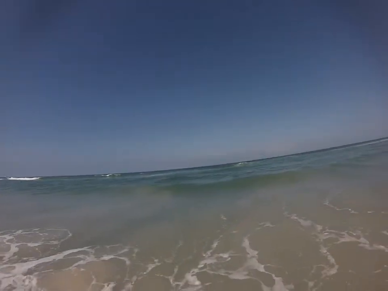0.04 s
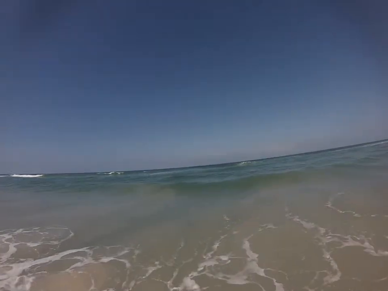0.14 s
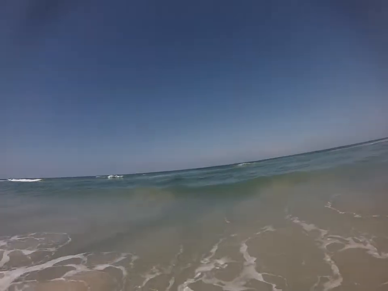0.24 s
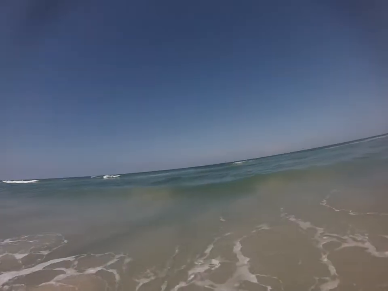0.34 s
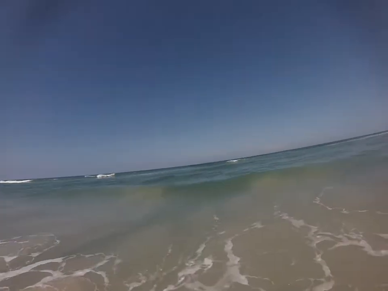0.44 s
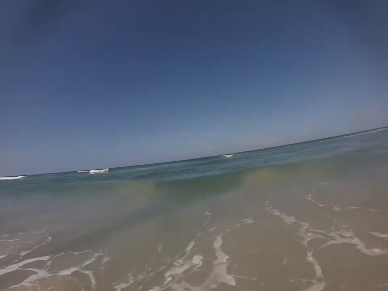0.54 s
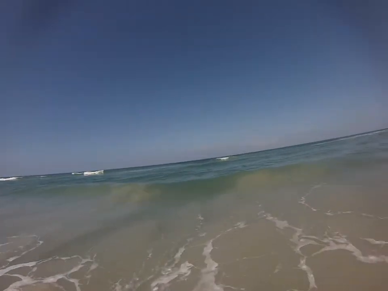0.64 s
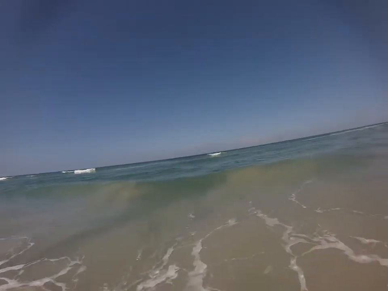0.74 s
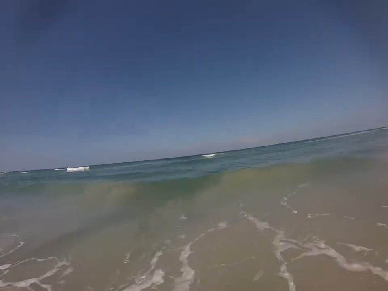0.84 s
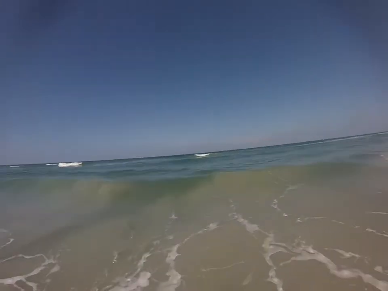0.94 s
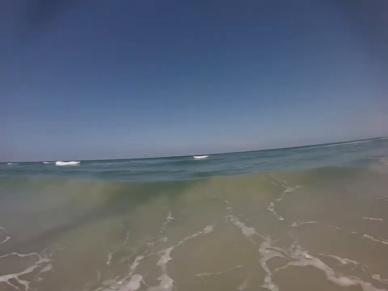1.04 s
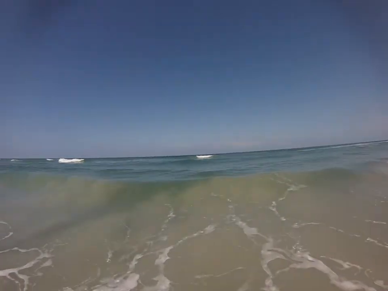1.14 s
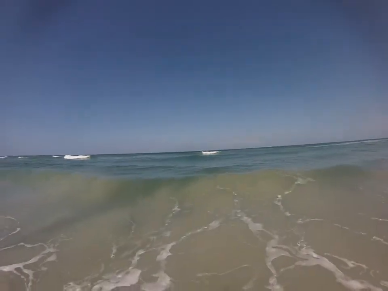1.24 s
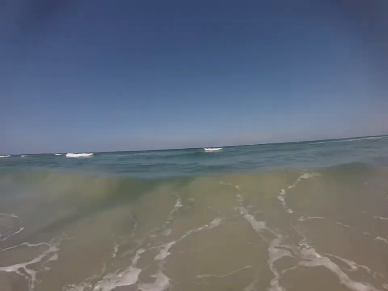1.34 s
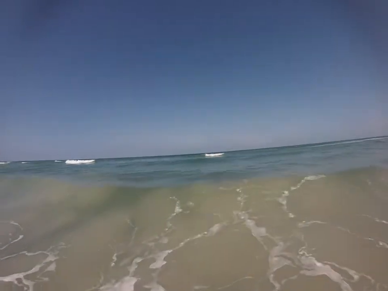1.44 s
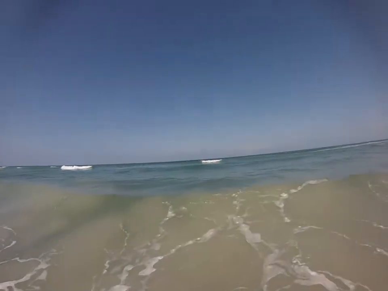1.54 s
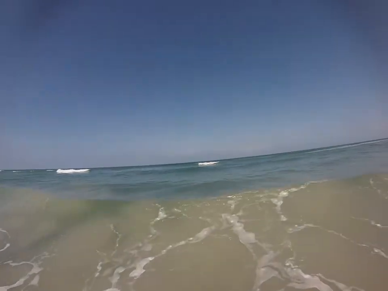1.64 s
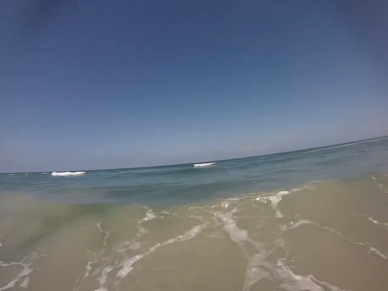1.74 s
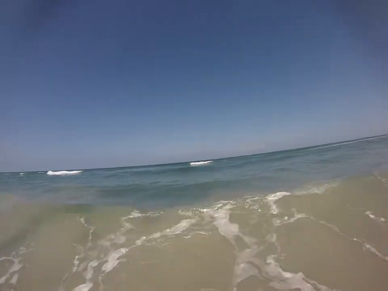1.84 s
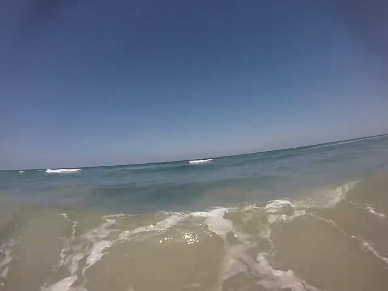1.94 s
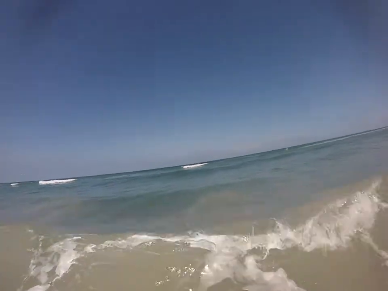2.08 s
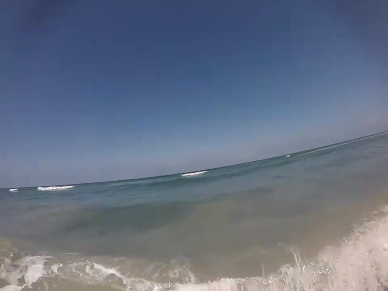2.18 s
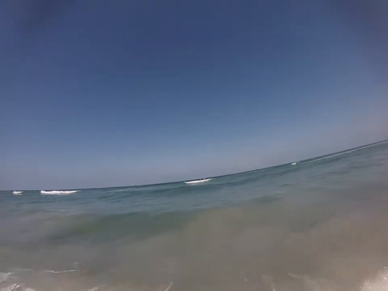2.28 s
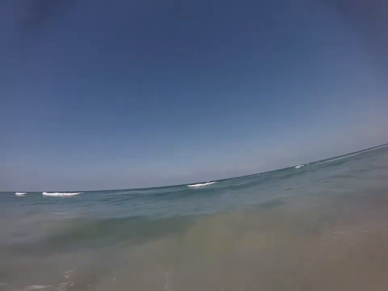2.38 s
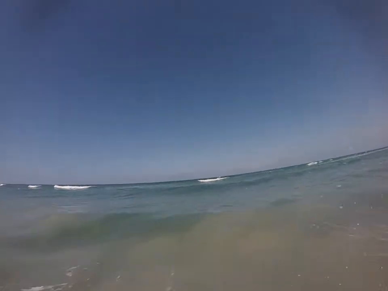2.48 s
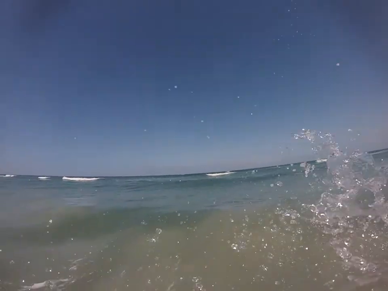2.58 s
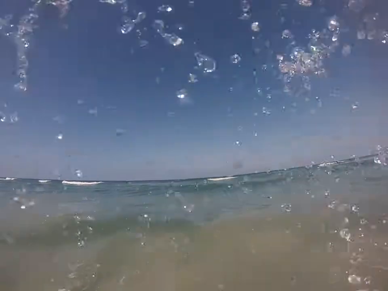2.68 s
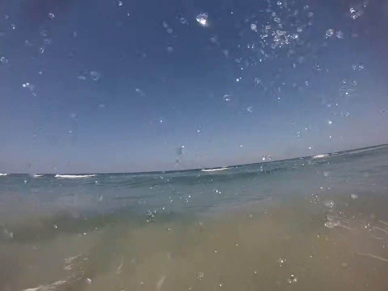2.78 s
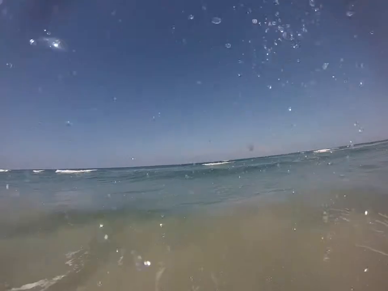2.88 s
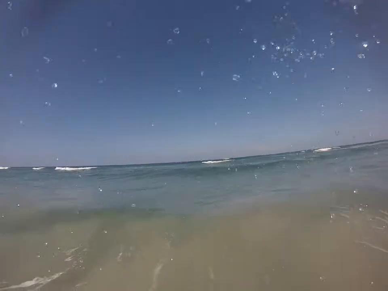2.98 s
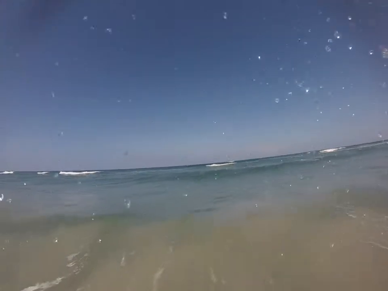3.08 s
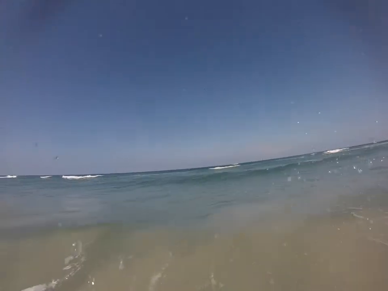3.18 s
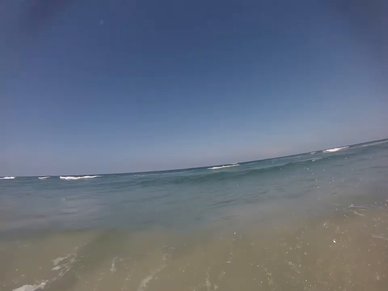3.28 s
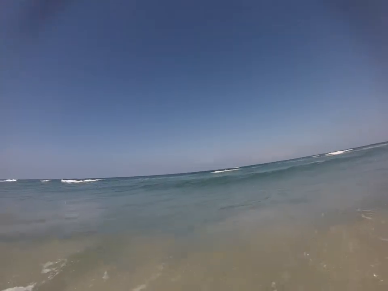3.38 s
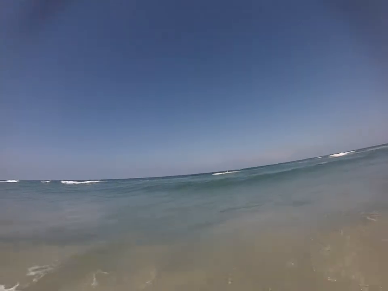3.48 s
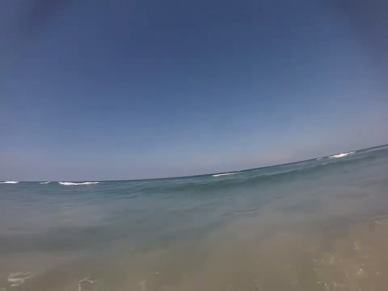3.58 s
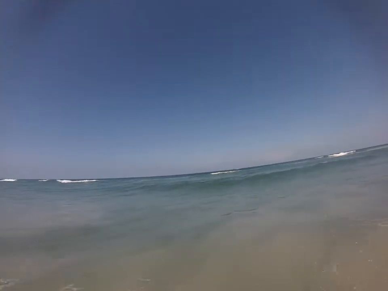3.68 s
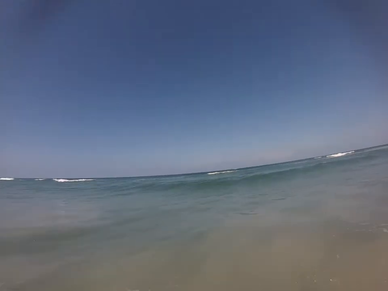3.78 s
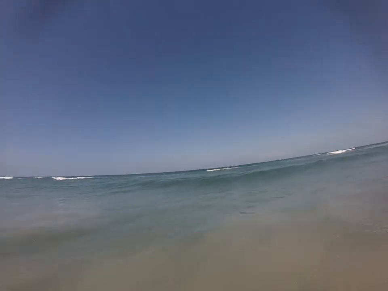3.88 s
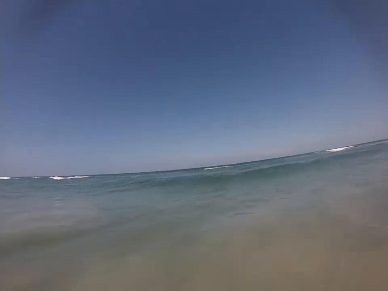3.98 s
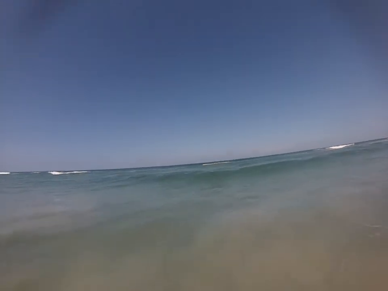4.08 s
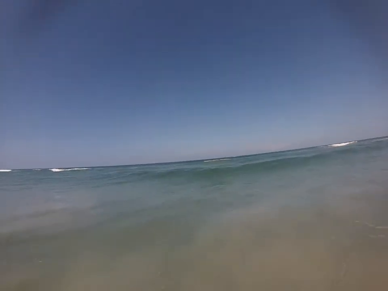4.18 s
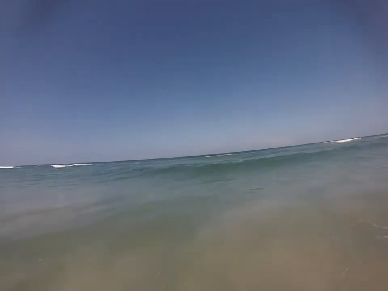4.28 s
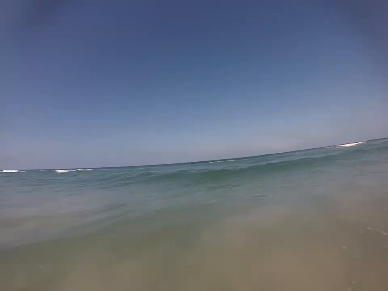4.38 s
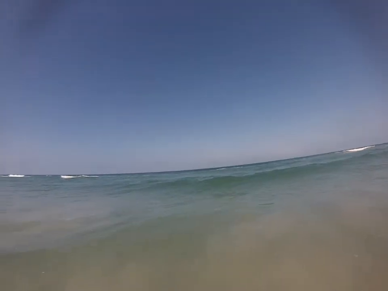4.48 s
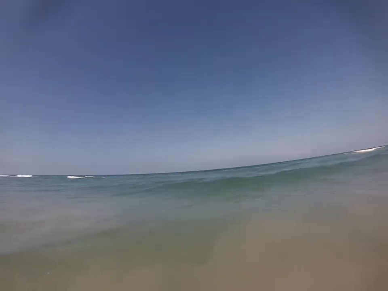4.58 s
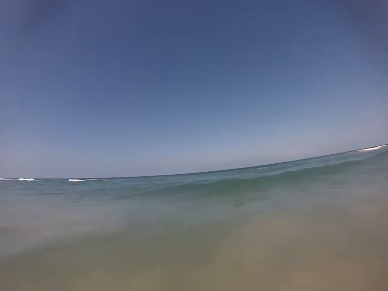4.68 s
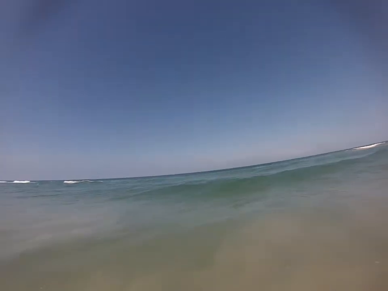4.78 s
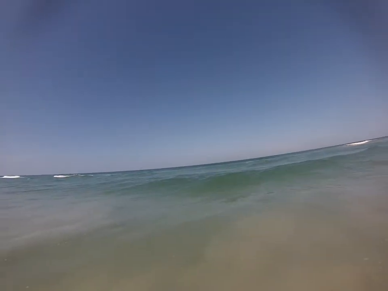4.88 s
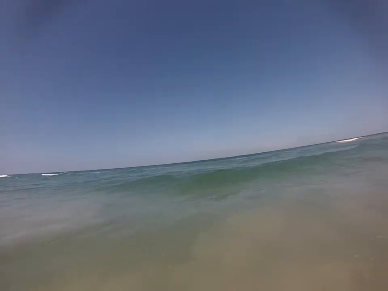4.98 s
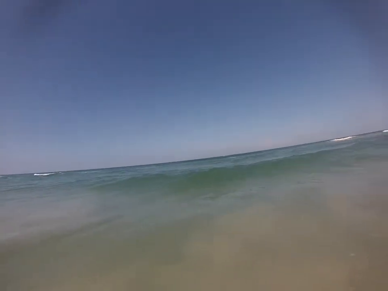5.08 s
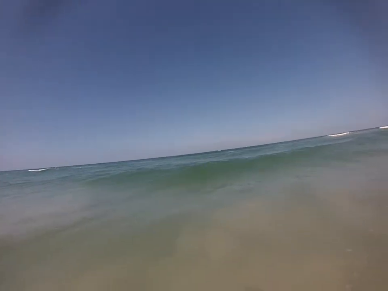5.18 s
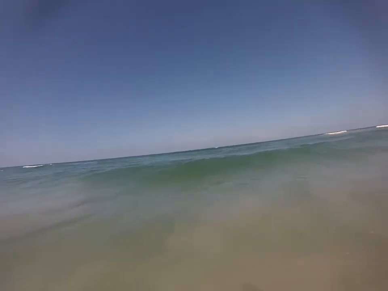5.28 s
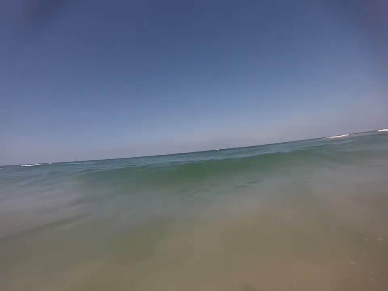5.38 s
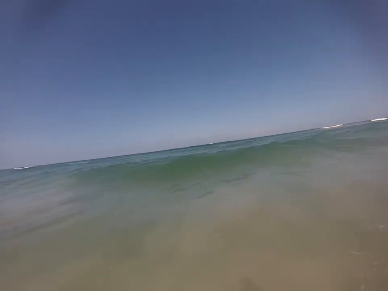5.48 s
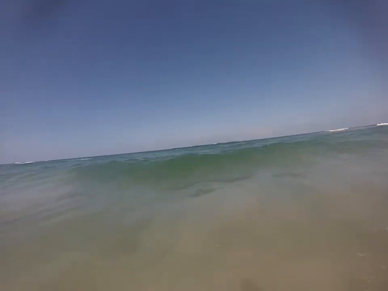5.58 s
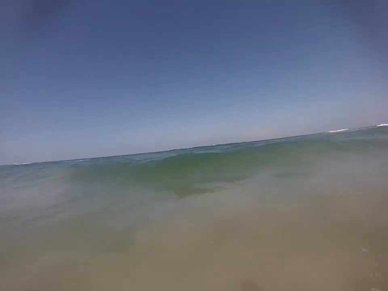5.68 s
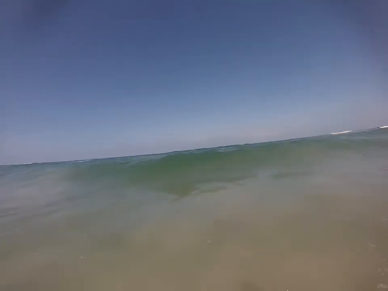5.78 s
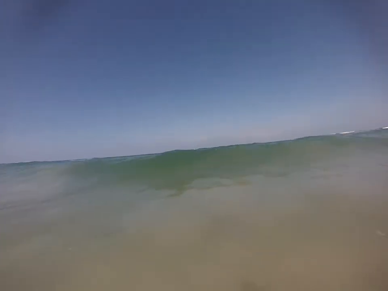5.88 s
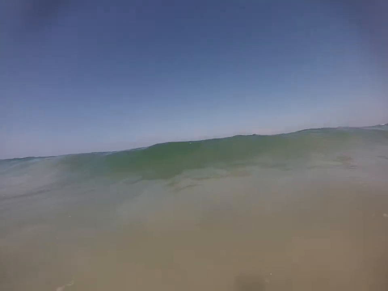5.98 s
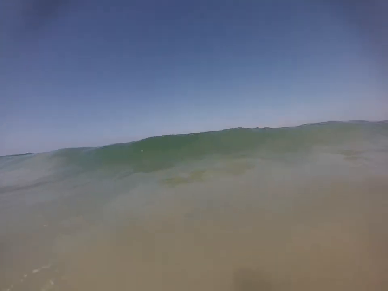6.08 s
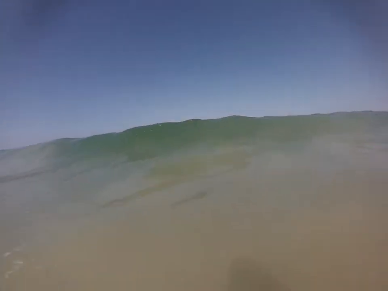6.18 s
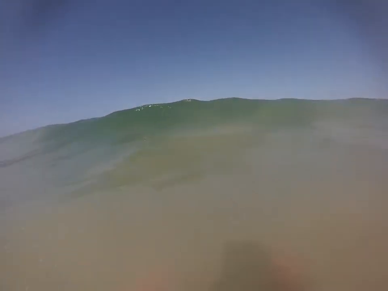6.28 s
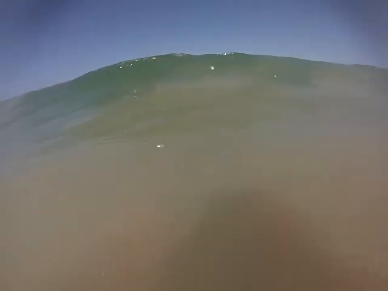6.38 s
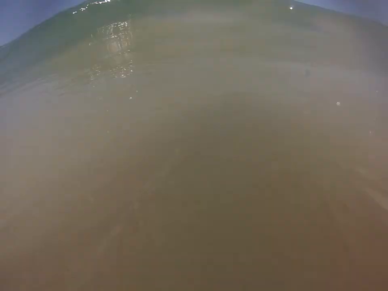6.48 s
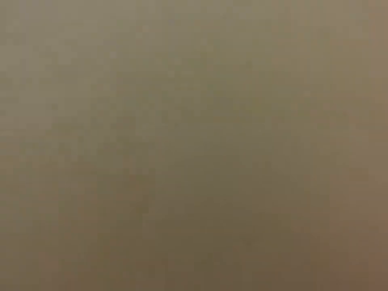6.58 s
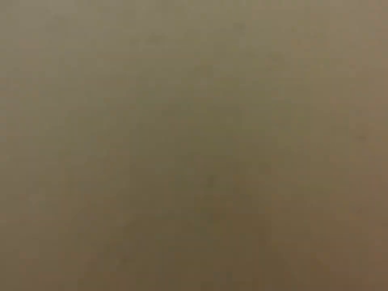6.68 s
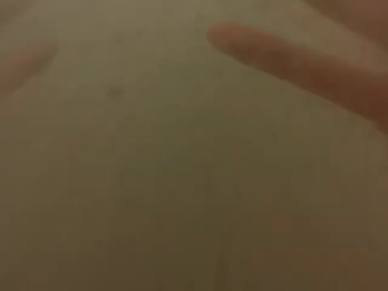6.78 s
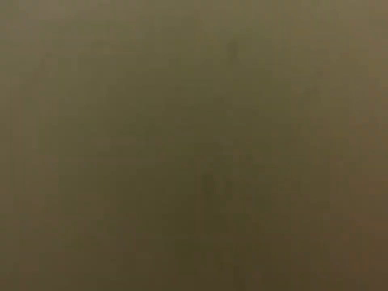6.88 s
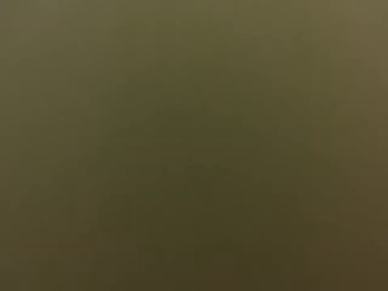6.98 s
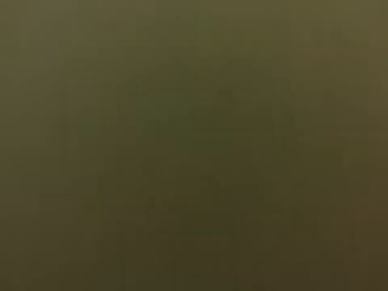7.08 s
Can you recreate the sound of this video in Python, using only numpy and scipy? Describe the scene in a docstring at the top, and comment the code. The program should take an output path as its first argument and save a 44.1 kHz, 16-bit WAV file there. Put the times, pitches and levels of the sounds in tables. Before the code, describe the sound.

Close, muffled sound from inside a sealed plastic case at the surface of shallow sea. Faint steady hiss and soft, boxy foam wash lie under very deep wading thumps at about 0, 0.7, 1.3 and 2 s, each a short sagging throb with a dull knock. Tiny drips sound near 1.1 s. From 2.2 s foam swells, peaking near 2.5 s with spatters; at 2.7 s a drop cracks sharply on the case, ringing thinly amid quick rising plips. Wash stays fuller until about 3.9 s, then thins, with sparse ticks, low rumble and thumps near 3, 4.6 and 5.4 s. Spatters gather around 5.5-6.5 s. At 6.58 s a wave slaps violently, distorting with a hollow honk; another heavy shove hits at 6.7 s. Until the end just after 7 s, dense wet crackle, short knocking slaps, slosh and low gurgles engulf everything, surf hiss vanishing.

```python
"""Surf hisses and rumbles through a sealed plastic camera housing carried by a wader in shallow water.
Foam is random clicks through the shell's resonances; each step swings the air sealed in the case.
Spray is short noise bursts, drips are gliding bubble tones, and a big drop rings the lens cover's modes.
At the end a wave slaps the housing, overloads the microphone and closes over the case: slaps are short
cavity tones, shoves smooth pressure pulses, and the water crackling and gurgling bubbles."""
import sys
import numpy as np
from scipy import signal
from scipy.fft import rfft, irfft, next_fast_len
from scipy.io import wavfile

SR = 44100
rng = np.random.default_rng(int(sys.argv[2]) if len(sys.argv) > 2 else 0)


def wrap_up_sound(samples):
    """Save the sound to the file named by the first command line argument, as 16-bit audio."""
    columns = np.atleast_2d(samples).T
    # keep every value between -1 and 1, then stretch to whole-number steps
    tamed = np.clip(columns, -1, 1)
    steps = np.round(tamed * 32767).astype(np.int16)
    wavfile.write(sys.argv[1], SR, steps)


N = 314874

# Foam round the case, before patter: time_s, wash_level_db, fizz_level_db
FOAM_LEVELS = [(0.0, -76, -81.5), (0.7, -74.5, -83.5), (1.05, -69.5, -81.5), (1.4, -75, -84.5),
               (2.07, -74.5, -86), (2.2, -68, -76), (2.32, -62, -70), (2.47, -54.5, -60.5),
               (2.6, -58.5, -73), (2.8, -61.5, -65), (2.92, -63, -87), (3.07, -59, -71.5),
               (3.27, -62, -68.5), (3.85, -65, -77.5), (4.03, -71, -89), (4.16, -65.5, -72),
               (4.43, -65, -79), (4.75, -70, -85), (5.17, -70.5, -80.5), (5.5, -71, -86), (5.9, -68, -83),
               (6.36, -69, -87), (6.47, -66, -68), (6.53, -53, -55)]
# Shell resonances fed by wash: pitch_hz, width_hz (of one pass), relative_level_db
WASH_MODES = [(1509, 373, 1), (2140, 330, -1.5), (2746, 250, -5), (3120, 230, -9.5)]
# Shell resonances fed by fizz: pitch_hz, width_hz (of one pass), relative_level_db
FIZZ_MODES = [(4750, 1300, 0), (5600, 900, -5), (6950, 1000, 0), (7730, 500, -3), (10800, 2400, -11)]
# Broad part of the wash through the shell: frequency_hz, gain_db
SHELL_LEAK = [(300, -7), (700, -8.5), (1200, -11), (3000, -15), (6000, -21.5), (9000, -28), (13000, -34),
              (15500, -60.5)]
# Spectrum shape of the microphone's own noise: frequency_hz, relative_density_db (per Hz)
MIC_NOISE = [(53, -34.5), (90, 0.5), (625, -11.5), (1480, -12.5), (1880, -19.5), (2090, -13.5), (2480, -17),
             (2760, -22.5), (11700, -30), (15500, -53.5)]
# Spectrum shape of rumble and slosh: frequency_hz, relative_density_db (per Hz)
RUMBLE = [(10, 2), (22, 8.5), (45, 3), (70, -3.5), (100, -33), (200, -45.5), (400, -61.5)]
# Wading steps and bumps of water: start_s, swell_peak_db, final_pitch_hz
STEPS = [(-.022, -18.5, 34.15), (0.655, -16.5, 33), (1.306, -27, 31.7), (1.983, -16.5, 33),
         (2.4325, -32.5, 46), (2.766, -40, 43.9), (2.991, -23, 38.2), (3.954, -39, 35.23),
         (4.612, -24, 36.4), (5.399, -20, 34.4), (5.444, -36.5, 41.7), (5.983, -36, 38.5),
         (6.422, -33.5, 35.94), (6.583, -26.5, 44.8)]
# Water pushing the wading body about: time_s, rumble_level_db (before shakes and drift)
SWAY = [(0.0, -59), (0.31, -59.5), (0.6, -62), (1.7, -66), (1.96, -58.5), (2.95, -51.5), (3.33, -65),
        (4.54, -55), (5.07, -61), (5.49, -50), (5.76, -59.5), (6.5, -50)]
# Spray on the case, before the shell: start_s, strike_level_db, brightness_db
SPRAY = [(1.1844, -50, -4), (1.9952, -49.5, 14), (2.3894, -41.5, 4), (2.476, -36, 3.5), (2.5635, -43, -16),
         (2.5938, -42.5, 8), (2.6399, -43, 6), (3.2345, -44, -1), (3.254, -43.5, -0.5), (3.4945, -44, -4),
         (3.5349, -54, -3.5), (3.7658, -43, 7), (3.7797, -45, 1), (4.2281, -46, 6), (5.5254, -47, 0.5),
         (5.6141, -46.5, 9.5), (5.8087, -47, 6), (5.8397, -47.5, 5.5), (6.009, -49, 6), (6.0743, -48, 5.5),
         (6.1855, -49.5, 10.5), (6.2444, -46.5, 5), (6.4425, -42.5, -7.5), (6.4602, -41, 10)]
# Drips plopping nearby: start_s, peak_db, first_pitch_hz, last_pitch_hz, length_ms
DRIPS = [(1.115, -62.5, 630, 726, 21.4), (1.18, -62, 4600, 4880, 12), (2.142, -51, 2370, 2954, 8.4),
         (2.646, -52, 890, 1308, 11.8), (2.656, -43, 1470, 2590, 14), (3.534, -41.5, 1970, 2650, 6.16)]
# Shoves of water against the case, before the vent: centre_s, peak_db, width_ms (standard deviation)
SHOVES = [(2.4383, -39, 0.88), (6.431, -39, 0.85), (6.586, -9, 3), (6.7067, 6, 0.81)]
# Lens cover modes, broad ones for the crack and thin ones ringing on: pitch_hz, level_db, t60_s
COVER_MODES = [(170, -38, .03), (330, -33, .015), (600, -26, .012), (1250, -26, .012), (1700, -26, .012),
               (2260, -24, .015), (3216, -17, .012), (4400, -11, .011), (5620, -16, .012), (6250, -19, .01),
               (7750, -11, .01), (9110, -8, .008), (11100, -10, .005), (13000, -22, .005), (3079, -52, .3),
               (4054, -56, .17), (4554, -44, .22), (4931, -42, .07), (5491, -59, .22), (5809, -58, .16),
               (6481, -50, .11), (7730, -52, .13)]
# Water tumbling over the case, before clumping: time_s, crackle_db, bright_crackle_db, slosh_db
UNDER_LEVELS = [(6.45, -70, -71.5, -45), (6.53, -53.5, -58.5, -41), (6.57, -40, -56, -47),
                (6.59, -28.5, -45.5, -43), (6.65, -40, -50.5, -35), (6.69, -29, -28.5, -43),
                (6.73, -42.5, -53.5, -44), (6.77, -35, -57, -28), (6.83, -34.5, -48, -45),
                (6.89, -35.5, -46, -34), (6.95, -30.5, -37.5, -23.5), (7.03, -38.5, -45.5, -43),
                (7.06, -36, -42, -36), (7.14, -43.5, -62, -48)]
# Spectrum shape given to the crackle: frequency_hz, relative_gain_db
CRACKLE = [(290, -39), (500, -9.5), (620, -14.5), (954, -13.5), (1990, -3), (2290, -0.5), (3010, -12),
           (3630, -12), (4980, -18.5), (7230, -13.5), (10200, -24), (11400, -20), (15500, -29)]
# Water slapping the microphone cavity: start_s, tone_level_db, pitch_hz, hold_ms (before decay)
SLAPS = [(6.5748, -14.5, 2150, 3.7), (6.581, 7.5, 2075, 2.08), (6.581, -6.5, 933, 1.7),
         (6.5868, -14, 1454, 1.9), (6.634, -24.5, 2196, 2.6), (6.657, -25, 2090, 1.1),
         (6.668, -16, 2230, 1.3), (6.6722, -17, 2230, 0.9), (6.674, -15, 1130, 0.6),
         (6.684, -24.5, 2500, 1.3), (6.696, -19, 2280, 2.1), (6.785, -20, 1830, 2.1),
         (6.84, -20.5, 2226, 5.1), (6.899, -14.5, 2102, 1.5), (6.908, -19, 1590, 1.4),
         (6.932, -24, 2220, 3.5), (7.004, -21, 2270, 2.2), (7.01, -21, 2425, 1.3), (7.039, -19, 804, 1)]
# Big air pockets gurgling: start_s, length_s, first_pitch_hz, last_pitch_hz, peak_db
GURGLES = [(6.71, 0.0433, 197, 186.4, -33), (6.789, 0.0553, 290, 235, -16), (6.857, 0.018, 224.5, 141, -14),
           (6.903, 0.026, 225, 322, -19), (6.945, 0.0194, 259, 293, -18), (7.033, 0.0214, 136, 129, -44),
           (7.07, 0.044, 285, 259, -29)]

MIC_NOISE_DB = -73.5
COVERED_S, DROP_S = 7.1, 2.6848   # the wave has closed over the case; the big drop lands
STEP_MS, STEP_TAIL_DB, STEP_TAIL_S = 10.1, -14, .05   # swell time constant; a weaker swing lingers
KNOCK_DB, KNOCK_FOLLOWS = -54, 0.46   # level for a 0 dB step; knock dB per step dB
# The body shakes around each step: level relative to the step, decay after it, growth before it
AFTERSHAKE_DB, AFTERSHAKE_S, LEG_SWING_S = -27, 0.044, 0.041
SPATTER_MS, SPATTER_GROWS = 3.3, 0.83   # decay time at -50 dB; dB of decay time per dB of level
STRAY_PER_S, STRAY_DB = 3.3, -54   # faint stray drops; lowest strike level
# Large bubbles begin once the case is under
CHURN_S, CHURN_RISE_S, CHURN_DB, CHURN_FADE_DB_PER_S = 6.67, 0.057, -28, 14.5
SLAP_DIES_MS = 1.13
CUTOFF_HZ = 15600


def from_db(db):
    """Level law: twenty decibels are a factor of ten in amplitude."""
    return 10 ** (np.asarray(db) / 20)


def rms_one(x):
    """Normalisation: dividing by the root mean square gives unit level."""
    return x / np.sqrt(np.mean(x ** 2) + 1e-20)


def in_time(rows):
    """Linear interpolation: each column of a time table is evaluated at every sample."""
    s, *columns = np.transpose(rows)
    return [np.interp(np.arange(N) / SR, s, column) for column in columns]


def filtered(x, order, edge_hz, kind):
    """Butterworth filtering: the pass band is maximally flat."""
    return signal.sosfilt(signal.butter(order, edge_hz, kind, fs=SR, output="sos"), x)


def colour(x, spectrum):
    """Spectral shaping: each Fourier component is scaled by a gain read on a log-frequency axis."""
    size = next_fast_len(len(x))
    hz, db = np.transpose(spectrum)
    log_bins = np.log(np.arange(size // 2 + 1) * SR / size + 1)
    gain = from_db(np.interp(log_bins, np.log(hz), db))
    return irfft(rfft(x, size) * gain, size)[:len(x)]


def drift(rate_hz):
    """Slow random fluctuation: a double pole smooths white noise, scaled to unit spread."""
    hold = 40   # samples between the slow values
    r = np.exp(-2 * np.pi * rate_hz * hold / SR)
    noise = rng.standard_normal(N // hold + 2002)
    slow = signal.lfilter([1], [1, -2 * r, r * r], noise)[2000:]   # settled part
    return np.interp(np.arange(N) / hold, np.arange(len(slow)), rms_one(slow))


def resonate(x, hz, width_hz):
    """Damped resonance: a pole pair whose radius sets the width, with about unit gain at its peak."""
    r = np.exp(-np.pi * width_hz / SR)
    zeros = np.array([1, 0, -1]) * (1 - r * r) / 2
    return signal.lfilter(zeros, [1, -2 * r * np.cos(2 * np.pi * hz / SR), r * r], x)


def resonances(x, modes):
    """Modal superposition: parallel resonances add, each applied twice for dark valleys between."""
    return sum(from_db(db) * resonate(resonate(x, hz, width_hz), hz, width_hz)
               for hz, width_hz, db in modes)


def patchy_shell(x, modes, patchy_db):
    """Incoherent excitation: each resonance takes another stretch of foam and flickers on its own."""
    return sum(resonances(np.roll(x, 1009 * k), [mode]) * from_db(patchy_db * drift(10))
               for k, mode in enumerate(modes))


def grains(per_s, spread_db):
    """Random arrivals: independent clicks of uneven size and either sign."""
    sizes = from_db(spread_db * np.minimum(rng.exponential(1, N), 4)) * rng.choice([-1, 1], N)
    return sizes * (rng.random(N) < per_s / SR) + 1e-18


def bubbles(per_s, low_hz, high_hz, cycles, spread_db):
    """Bubble resonance: each swells and dies in a few cycles at one of 18 pitches; the sum has rms 1."""
    born = grains(per_s, spread_db)
    dealt = rng.integers(0, 18, N)   # which pitch a bubble gets
    total = np.zeros(N)
    for k, hz in enumerate(np.geomspace(low_hz, high_hz, 18)):
        own = born * (dealt == k) + 1e-18
        total += resonances(own, [(hz, 3.3 * hz / cycles, 0)]) / np.sqrt(hz)
    return rms_one(total)


def add(out, s, x):
    """Superposition: x is summed into out from time s, cut to what fits."""
    at = round(s * SR)
    x = x[max(-at, 0):N - at]
    out[max(at, 0):max(at, 0) + len(x)] += x


def microphone_hiss():
    """Self-noise: steady random noise has the microphone's own spectrum."""
    return from_db(MIC_NOISE_DB) * rms_one(colour(rng.standard_normal(N), MIC_NOISE))


def shaking():
    """Addition of powers: the push of the water and a shake around each step set the rumble gain."""
    power, t = from_db(2 * in_time(SWAY)[0]), np.arange(N) / SR
    for s, db, hz in STEPS:
        since = t - s - 2 / hz   # the shake peaks two periods into the step
        fall_s = np.where(since > 0, AFTERSHAKE_S, LEG_SWING_S)
        power = power + from_db(2 * (db + AFTERSHAKE_DB)) * np.exp(-np.abs(since) / fall_s)
    return np.sqrt(power)


def body_rumble():
    """Structure-borne sound: low noise follows the shaking of the wading body."""
    noise = rms_one(colour(rng.standard_normal(N), RUMBLE))
    return noise * shaking() * from_db(3.15 * drift(10))


def surf():
    """Resonant transmission: bursting foam excites the shell; it and the rumble stop once covered."""
    wash_db, fizz_db = in_time(FOAM_LEVELS)
    above = np.clip((COVERED_S - np.arange(N) / SR) / 0.015, 0, 1)
    patter_db = 1.3 * drift(25)

    foam = grains(9000, spread_db=4.5)
    wash = rms_one(patchy_shell(foam, WASH_MODES, patchy_db=0.5) + colour(foam, SHELL_LEAK))
    trickles = bubbles(500, 900, 3300, cycles=14.0, spread_db=2.5)   # near the case
    wash = wash + from_db(-8) * trickles

    spume = grains(9000, spread_db=4.5)
    broad_fizz = resonances(spume, [(5039, 4500, 0.0001)])
    fizz = rms_one(patchy_shell(spume, FIZZ_MODES, patchy_db=1.0) + from_db(-10.5) * broad_fizz)

    hiss = wash * from_db(wash_db + patter_db) + fizz * from_db(fizz_db + 1.4 * patter_db)
    return above * (hiss + body_rumble())


def steps():
    """Enclosed-air oscillation: a step starts a dip and dying swings of sagging pitch, with a dull knock."""
    out, t = np.zeros(N), np.arange(SR // 4) / SR
    rise = t * 500 / STEP_MS   # 1 at the swell's peak, two time constants in
    swell = rise ** 2 * np.exp(2 - 2 * rise)
    end_fade = np.hanning(2 * len(t))[len(t):]
    tail = np.minimum(rise, 1) ** 2 * np.exp(-t / STEP_TAIL_S) * end_fade
    swell = swell + from_db(STEP_TAIL_DB) * tail
    for s, db, hz in STEPS:
        turns = hz * (t + 0.0081 * (1 - np.exp(-t / 0.012)))   # starts sharp, settles at hz
        thump = from_db(db) * swell * np.sin(2 * np.pi * turns)
        knock = rms_one(filtered(rng.standard_normal(len(t)), 2, [80, 380], "band"))
        knock = knock * (t / .012) * np.exp(1 - t / .012)
        add(out, s, from_db(KNOCK_DB + KNOCK_FOLLOWS * db) * knock - thump)
    return out


def spray():
    """Impact excitation: short noisy spatters ring the shell, stronger ones lasting longer."""
    dull, bright, t = np.zeros(N), np.zeros(N), np.arange(SR // 20) / SR
    chance = rng.random((round(STRAY_PER_S * COVERED_S), 3))
    stray = chance * [COVERED_S, 5, 10] + [0, STRAY_DB, -4]   # same columns as SPRAY
    for s, db, bright_db in [*SPRAY, *stray]:
        decay_ms = max(SPATTER_MS * from_db(SPATTER_GROWS * (db + 50)), .3)
        envelope = np.minimum(t / .005, 1) ** 2 * np.exp(-t * 1000 / decay_ms)
        tick = from_db(db) * rng.standard_normal(len(t)) * envelope
        add(dull, s, tick)
        add(bright, s, tick * from_db(bright_db))
    dull = filtered(dull + 1e-18, 1, 3000, "high")
    dull_ring = from_db(19.5) * resonances(dull, WASH_MODES)
    return dull_ring + from_db(-4.0) * resonances(bright + 1e-18, FIZZ_MODES)


def drips():
    """Trapped-bubble resonance: pitch rises unsteadily as the bubble nears the surface."""
    out = np.zeros(N)
    for s, db, first_hz, last_hz, ms in DRIPS:
        size = round(ms * SR / 1000)
        glide = 2 * np.pi * np.linspace(first_hz, last_hz, size) / SR
        phase = np.cumsum(glide + 0.21 * rng.standard_normal(size))
        add(out, s, from_db(db) * np.hanning(size) * np.sin(phase))
    return out


def shoves():
    """Pressure equalisation: a smooth inward push rebounds through the vent, a high-pass filter."""
    push, t = np.zeros(N), np.arange(-300, 301) / SR
    for s, db, ms in SHOVES:
        add(push, s + t[0], -from_db(db) * np.exp(-.5 * (t * 1000 / ms) ** 2))
    return filtered(push + 1e-18, 1, 75, "high")


def big_drop():
    """Modal impact: one blow strikes every lens cover mode, signs alternating, and a short splash."""
    out, t = np.zeros(N), np.arange(SR // 3) / SR
    ring = np.zeros(len(t))
    for k, (hz, db, t60) in enumerate(COVER_MODES):
        ring += (-1) ** k * from_db(db - 60 * t / t60) * np.sin(2 * np.pi * hz * t)
    splash = filtered(rng.standard_normal(len(t)), 2, [3000, 12000], "band")
    splash = splash * (from_db(-8) * np.exp(-t / .0009) + from_db(-33) * np.exp(-t / .004))
    add(out, DROP_S, np.minimum(t / 0.0003023, 1) * (ring + splash))
    return out


def plunge():
    """Bubble-swarm radiation: small bubbles and clicks crackle over low slosh and large-bubble churn."""
    crackle_db, bright_db, slosh_db = in_time(UNDER_LEVELS)
    t = np.arange(N) / SR
    wet = np.clip((t - 6.42) / 0.026, 0, 1)
    clumps_db = 2.5 * drift(70) + 1.5 * drift(18)

    swarm = bubbles(2200, 576.0, 14130, cycles=18.6, spread_db=2.0)
    clicks = rms_one(grains(6000, spread_db=5.5))
    pops = bubbles(200, 3500, 13500, cycles=20.0, spread_db=4.0)   # lone and bright
    crackle = colour(swarm + from_db(-3.0) * clicks + from_db(-2) * pops, CRACKLE)
    dull = rms_one(filtered(crackle, 4, 3600, "low"))
    bright = rms_one(filtered(crackle, 4, 3600, "high"))
    fine = (dull * from_db(crackle_db) + bright * from_db(bright_db)) * from_db(clumps_db)

    slosh = rms_one(colour(rng.standard_normal(N), RUMBLE)) * from_db(slosh_db)
    under_s = t - CHURN_S
    churn_gain = np.clip(under_s / CHURN_RISE_S, 0, 1) * from_db(CHURN_DB - CHURN_FADE_DB_PER_S * under_s)
    churn = bubbles(350, 90, 430, cycles=11.0, spread_db=3.0) * churn_gain
    return wet * (fine + slosh + churn)


def slaps():
    """Cavity resonance: a slap rings the microphone cavity unevenly, with a quick spit of noise."""
    out, t = np.zeros(N), np.arange(SR // 30) / SR
    for s, db, hz, hold_ms in SLAPS:
        decay = np.exp(-np.maximum(t * 1000 - hold_ms, 0) / SLAP_DIES_MS)
        burst = np.minimum(t / 0.00033, 1) * decay
        wobble = np.cumsum(rng.standard_normal(len(t))) * 0.16   # random walk of phase
        soft_noise = signal.lfilter([.09], [1, -1.4, .49], rng.standard_normal(len(t)))
        spit = .6 * soft_noise * np.exp(-t / .002)
        add(out, s, from_db(db) * burst * (np.sin(2 * np.pi * hz * t + wobble) + spit))
    return out


def gurgles():
    """Volume-dependent resonance: air pockets sing a few cycles, gliding as their size changes."""
    out = np.zeros(N)
    for s, length_s, first_hz, last_hz, db in GURGLES:
        size = round(length_s * SR)
        phase = 2 * np.pi * np.cumsum(np.linspace(first_hz, last_hz, size)) / SR
        add(out, s, from_db(db) * np.hanning(size) ** .7 * np.sin(phase))
    return out


def scene():
    """Linear superposition: all pressures add at one microphone."""
    above = microphone_hiss() + surf() + steps() + spray() + drips() + shoves() + big_drop()
    return (above + plunge() + slaps() + gurgles())[None]


def record(dry):
    """Overload: the input clips hard just below full scale, then a steep low-pass cuts the top."""
    low_pass = signal.cheby2(12, 60, CUTOFF_HZ, fs=SR, output="sos")
    return signal.sosfilt(low_pass, np.clip(dry, -.98, .98))


dry = scene()
out = record(dry)
wrap_up_sound(out)
```